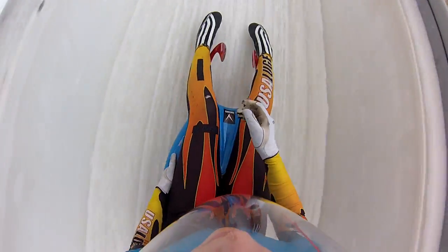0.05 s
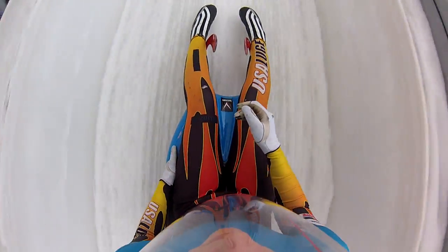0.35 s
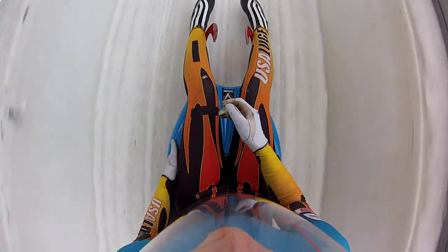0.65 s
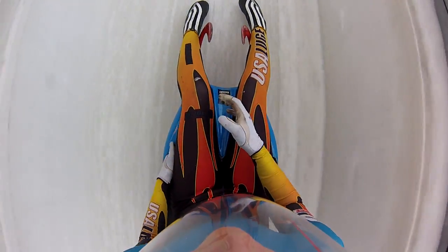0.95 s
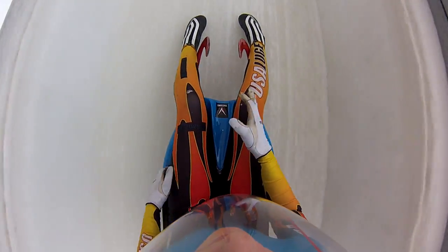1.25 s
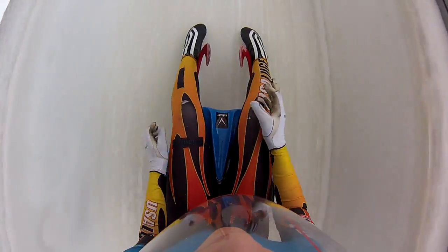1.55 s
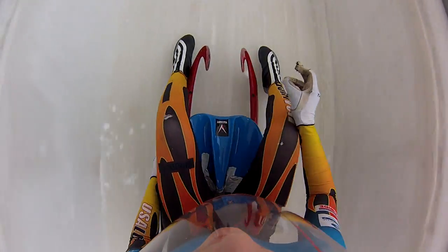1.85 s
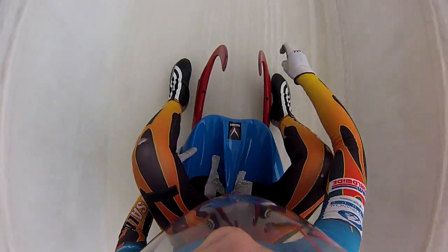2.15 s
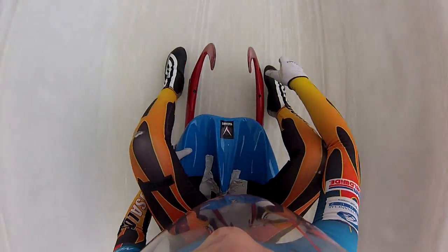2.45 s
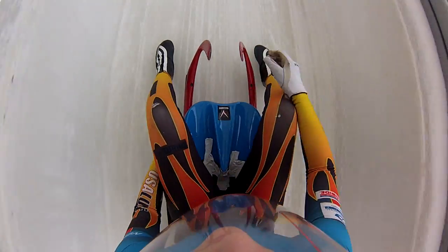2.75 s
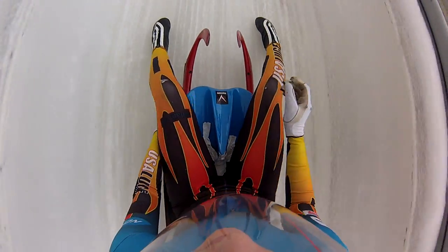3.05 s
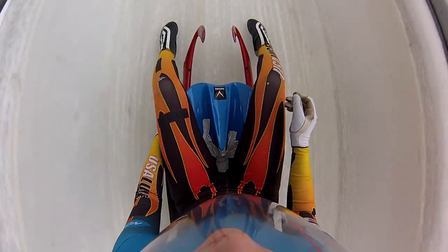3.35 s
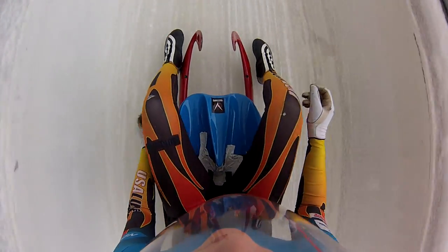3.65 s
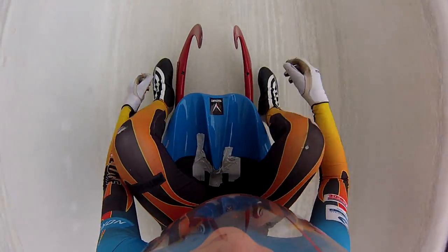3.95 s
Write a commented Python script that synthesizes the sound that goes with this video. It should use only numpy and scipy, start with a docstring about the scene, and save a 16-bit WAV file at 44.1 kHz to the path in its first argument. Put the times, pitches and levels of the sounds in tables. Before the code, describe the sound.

A racing sled's steel runners grind and hiss down an ice track, heard from the rider's helmet. Wind buffets the microphone as the shell rattles over bumps. Ice chips tick early on, then the runners briefly skid and squeak.

```python
"""Steel runners of a racing sled grind down an ice track, heard from the rider's helmet.
Tiny fractures of the ice excite their resonances; they chatter, skid, ring and squeak for a moment
and throw up a hiss of shaved ice. Chips tick against the sled, its shell rattles and booms at bumps,
and the uneven track makes it rumble. Wind buffets the microphone throughout, over a dull rush."""
import sys
import numpy as np
from scipy import signal
from scipy.fft import rfft, irfft
from scipy.io import wavfile
from scipy.ndimage import uniform_filter1d

SR = 44100
rng = np.random.default_rng(int(sys.argv[2]) if len(sys.argv) > 2 else 0)


def put_to_file(sound):
    """Save the sound as 16-bit audio at rate SR, in the file named by the first command-line argument."""
    columns = np.atleast_2d(sound).T  # one column per channel
    safe = np.clip(columns, -1, 1)
    whole_steps = np.round(safe * 32767)
    wavfile.write(sys.argv[1], SR, whole_steps.astype(np.int16))


N = 176400

GRAINS_PER_S, GRAIN_SPREAD_DB = 7000, 2.5
CHATTER_HZ, CHATTER_DB = 42, 0.88
SLIP_S = 0.013  # half length of a squeak or skid


def runners():
    """Ice grains excite the runners' resonances; the contact chatters, skids, bites and goes light."""
    # grinding: t/s, low band level/dB, high band level/dB
    grind = [(0, -38.5, -45.5), (.23, -39, -43), (.46, -39.5, -43), (.54, -44, -47), (.85, -41.5, -43),
             (1.25, -43, -43.5), (1.52, -40.5, -42), (2.05, -46, -44.5), (2.3, -47.5, -44),
             (2.8, -47.5, -43), (3.13, -50.5, -49), (3.35, -49.5, -48), (4, -54.5, -46.5)]
    # spectrum of the lower resonances: f/Hz, level/dB
    low_colour = [(800, -19.5), (1090, -9), (1190, -0.5), (1290, 2), (1400, 0), (1520, 0.5), (2700, -13.5),
                  (4000, -104)]
    # spectrum of the upper resonances: f/Hz, level/dB
    high_colour = [(1300, -7.5), (1750, -1.5), (1950, 7), (2150, 6), (2480, 4), (2660, -7.5), (3080, -1),
                   (3300, -4), (3700, 0.5), (4150, -11), (12000, -49)]
    # dry scrape, pitched between grinding and hiss: t/s, level/dB
    scrape_level = [(0, -55.5), (.3, -53.5), (.6, -60), (1.3, -53.5), (2.5, -53.5), (2.9, -55), (3.13, -62),
                    (3.4, -61), (4, -58)]
    # its spectrum: f/Hz, level/dB
    scrape_colour = [(3000, -37), (4050, -3), (4900, 4.5), (5500, 2.5), (7500, -14.5), (16000, -27)]
    # short sideways skids: t/s, scrape boost/dB
    skids = [(1.957, 10), (2.535, 8)]
    # the runners bite (+) or go light (-): t/s, gain/dB
    bites = [(.13, -4.5), (1.74, 2), (2.18, 4.5), (2.3, 3.5), (2.77, 2), (3.14, -3), (3.7, -1.5),
             (3.96, 4.5)]
    low = colour(grains(), low_colour) * curve(grind)
    high = colour(grains(), high_colour) * curve(grind, column=2)
    scrape = colour(grains(), scrape_colour) * curve(scrape_level) * swells(skids, SLIP_S)
    chatter = undb(CHATTER_DB * walk(CHATTER_HZ))
    return (low + high + scrape) * chatter * swells(bites, width_s=.025)


def grains():
    """Dense tiny fractures of the ice, of very unequal size."""
    hit = rng.random(N) < GRAINS_PER_S / SR
    polarity = np.sign(noise())
    size_db = GRAIN_SPREAD_DB * np.minimum(rng.exponential(size=N), 6)
    return hit * polarity * undb(size_db)


def ringing():
    """One runner resonance stands out while the edge bites."""
    # runner rings: start/s, end/s, f/Hz, width/Hz, level/dB
    rings = [(.75, .96, 2270, 270, -46), (0.756, 1.292, 2154, 86, -42.5), (3.245, 4.05, 2170, 400, -59.5)]
    fade_s = 0.0093
    t, out = seconds(), 0
    for start, end, hz, width, db in rings:
        gate = np.clip(np.minimum(t - start, end - t) / fade_s + .5, 0, 1)
        ring = resonate(grains(), [(hz, width / 2, 0)])
        out += gate * undb(db) * steady(ring, span_s=.012)
    return out


def squeaks():
    """The steel sticks and slips at one resonance, giving a brief wavering tone."""
    # runner squeaks: t/s, f/Hz, level/dB
    slips = [(2.248, 3090, -45.5), (2.294, 2440, -40.5), (2.33, 3490, -45.5), (2.385, 3500, -48)]
    waver = 0.0092  # share of the pitch
    clock = np.cumsum(1 + waver * walk(CHATTER_HZ)) / SR
    t, out = seconds(), 0
    for at, hz, db in slips:
        envelope = undb(db) * np.exp(-((t - at) / SLIP_S) ** 2)
        out += envelope * unit(np.sin(2 * np.pi * hz * clock))
    return out


def hiss():
    """Fine, fluttering spray of shaved ice."""
    # spray: t/s, level/dB
    level = [(0, -57.5), (.44, -59.5), (.55, -65.5), (.78, -61), (.805, -50), (.84, -55), (.865, -63),
             (.915, -63), (.94, -50), (1.11, -54), (1.2, -49), (1.95, -49), (3.05, -51.5), (3.14, -57),
             (3.39, -50), (3.44, -54.5), (3.49, -50.5), (3.7, -57.5), (4, -55.5)]
    # its spectrum: f/Hz, level/dB
    spectrum = [(4500, -14), (6200, -4.5), (6900, 4), (7400, -2), (7850, 0), (8900, -7.5), (10300, -11),
                (11900, -7), (12600, -14.5), (14000, -14), (15200, -25)]
    flutter_db = 1.44
    spray = colour(unit(grains()) + noise(), spectrum)
    return spray * curve(level) * undb(flutter_db * walk(30))


def chips():
    """Flying ice ticks against the sled: a short bright ring and a broadband crack."""
    # chip strikes: t/s, level/dB, ring f/Hz
    ticks = [(0.019, -38.5, 7800), (.416, -45, 7700), (.52, -58, 13500), (.534, -53, 14000),
             (0.719, -50, 8340), (0.944, -36, 7200)]
    half_width_hz, crack_db = 660, -8
    attack_s, decay_s = .0015, .003
    t, out = seconds(), 0
    for start, db, hz in ticks:
        attack = np.clip((t - start) / attack_s, 0, 1)
        decay = np.exp(-np.abs(t - start) / decay_s)
        ring = resonate(noise(), [(hz, half_width_hz, 0)])
        crack = undb(crack_db) * noise()
        out += undb(db) * attack * decay * (ring + crack)
    return out


def shell():
    """The sled's shell rattles all the time and booms briefly at each bump."""
    # low pair of shell resonances: f/Hz, half width/Hz, level/dB
    low_pair = [(261.8, 23.5, 0.5), (295.3, 43, -4.5)]
    # high pair: f/Hz, half width/Hz, level/dB
    high_pair = [(410.4, 21.8, 0.0069), (445, 20.3, 0)]
    # constant rattle: t/s, low pair level/dB, high pair level/dB
    rattle = [(0, -46, -57.5), (1.8, -50.5, -52.5), (4, -54.5, -53.5)]
    # bumps in the ice: t/s, length/s, low pair level/dB, high pair level/dB
    bumps = [(0.025, 0.088, -42.5, -47), (0.216, 0.017, -37.5, -55), (0.405, 0.042, -35, -46),
             (0.832, 0.041, -39.5, -47), (1.12, 0.013, -35, -42), (1.629, 0.031, -43.5, -45),
             (2.047, 0.034, -44, -44), (2.199, 0.06, -61, -50), (2.438, 0.017, -50, -41),
             (2.493, 0.0052, -47.5, -34), (2.694, 0.038, -41.5, -42.5), (2.744, 0.091, -45, -42),
             (2.985, 0.03, -46, -52), (3.138, 0.058, -49.5, -47), (3.401, 0.03, -48, -53),
             (3.939, 0.013, -54, -40.5)]
    flutter_db, attack_s, decay_s = 3.5, .004, .008
    t, out = seconds(), 0
    shake = undb(flutter_db * walk(25))
    for pair, modes in enumerate([low_pair, high_pair]):
        out += resonate(noise() * shake, modes) * curve(rattle, column=pair + 1)
        push = 0
        for start, length, *pair_db in bumps:
            attack = np.clip((t - start) / attack_s, 0, 1)
            release = np.exp(-np.maximum(t - start - length, 0) / decay_s)
            push += undb(pair_db[pair]) * attack * release
        out += push * steady(resonate(noise(), modes), span_s=.02)
    return out


def rumble(pressure):
    """Low rumble of the sled on the uneven ice, throbbing with the eddies."""
    # rumble spectrum: f/Hz, level/dB
    spectrum = [(30, -10.5), (55, 4.5), (112, -5.5), (145, -22.5), (600, -114)]
    level_db, throb_db = -34.5, 2.5
    return undb(level_db + throb_db * pressure) * steady(colour(noise(), spectrum), span_s=.15)


def wind(pressure):
    """Turbulence and eddies buffet the microphone."""
    # buffeting: t/s, level/dB
    level = [(0, -17), (1.8, -26), (3.4, -26.5), (4, -31.5)]
    # turbulence spectrum: f/Hz, level/dB
    spectrum = [(15, -2.5), (24, -1.5), (35, -21.5), (110, -30), (190, -39), (600, -84)]
    # strong buffets: t/s, turbulence boost/dB
    buffets = [(.49, 6), (.86, 6.5), (1.66, 11), (2.76, 9.5)]
    turbulence = steady(colour(noise(), spectrum), span_s=.1)
    return curve(level) * (swells(buffets, width_s=.04) * turbulence + pressure)


def eddies():
    """Pressure of the eddies that the helmet sheds at an uneven rate."""
    shedding_hz = 14.5 * (1 + .14 * walk(12))
    return np.sin(2 * np.pi * np.cumsum(shedding_hz) / SR)


def rush():
    """Dull, fluttering bed of rushing air and ice."""
    # rush: t/s, level/dB
    level = [(0.03, -52), (1.6, -52), (4.0, -60.5)]
    # its spectrum: f/Hz, level/dB
    spectrum = [(150, -1), (500, 6), (660, 2), (850, 5), (1080, 0), (3000, -84)]
    flutter_db = 3
    return colour(noise(), spectrum) * curve(level) * undb(flutter_db * walk(29))


def undb(db):
    """Decibels to gain."""
    return 10 ** (np.asarray(db) / 20)


def unit(x):
    """Scale to rms 1."""
    return x / np.sqrt(np.mean(x ** 2))


def seconds():
    """Time of every sample."""
    return np.arange(N) / SR


def bins():
    """Frequency of every spectral bin, at least 1 Hz."""
    return np.maximum(np.arange(N // 2 + 1) * SR / N, 1)


def noise():
    """White noise."""
    return rng.standard_normal(N)


def curve(rows, column=1):
    """Gain envelope from one dB column of a table."""
    rows = np.array(rows)
    return undb(np.interp(seconds(), rows[:, 0], rows[:, column]))


def swells(rows, width_s):
    """Gain with a bell-shaped swell or dip at each row of t/s, gain/dB."""
    t = seconds()
    return undb(sum(db * np.exp(-((t - at) / width_s) ** 2) for at, db in rows))


def colour(x, points):
    """Equalise through points of f/Hz, level/dB; rms 1."""
    hz, db = np.array(points).T
    response = undb(np.interp(np.log(bins()), np.log(hz), db))
    return unit(irfft(rfft(x) * response, N))


def resonate(x, modes):
    """Ring steep-skirted resonances of f/Hz, half width/Hz, level/dB; rms 1."""
    f, response = bins(), 0
    for hz, half_width, db in modes:
        detuning = (f / hz - hz / f) * hz / (2 * half_width)
        response += undb(db) / (1 + 1j * detuning) ** 2
    return unit(irfft(rfft(x) * response, N))


def walk(rate_hz):
    """Smooth random modulation up to about rate_hz; rms 1."""
    return unit(irfft(rfft(noise()) * np.exp(-(bins() / rate_hz) ** 2), N))


def steady(x, span_s):
    """Even out the swells of a noise, so that its envelope alone sets the strength."""
    power = uniform_filter1d(x ** 2, max(int(span_s * SR), 2))
    return x / np.sqrt(power + 1e-9)


def scene():
    """Everything rides with the microphone, in mono."""
    pressure = eddies()
    ice = runners() + hiss()
    bed = wind(pressure) + rumble(pressure) + rush()
    return (ice + bed + ringing() + squeaks() + shell() + chips())[None]


def record(dry):
    """The helmet camera cuts the top treble steeply."""
    top_hz = 15250
    return signal.sosfilt(signal.ellip(10, .2, 80, top_hz, fs=SR, output="sos"), dry)


dry = scene()
out = record(dry)
put_to_file(out)
```